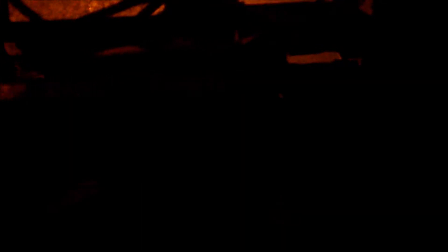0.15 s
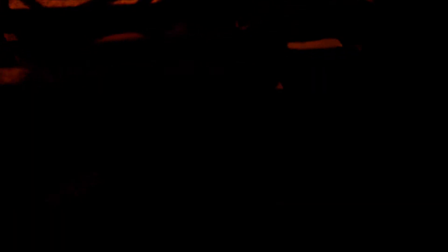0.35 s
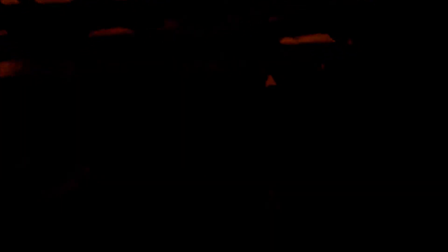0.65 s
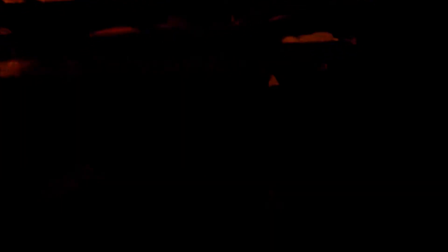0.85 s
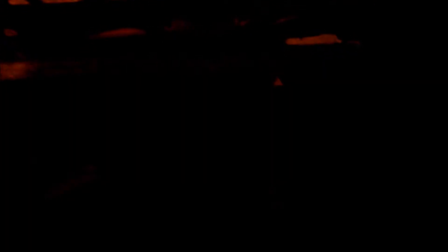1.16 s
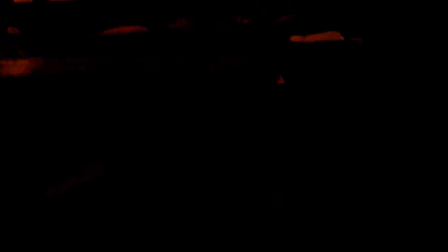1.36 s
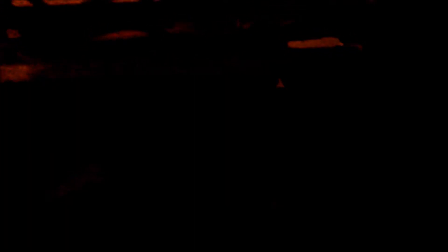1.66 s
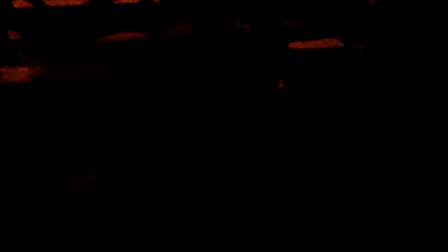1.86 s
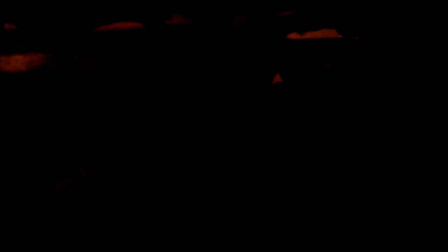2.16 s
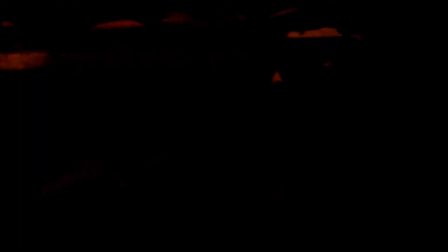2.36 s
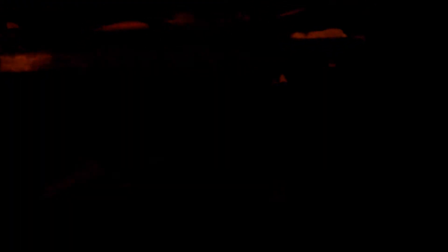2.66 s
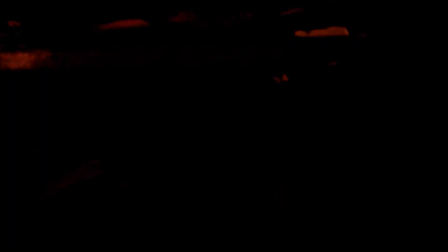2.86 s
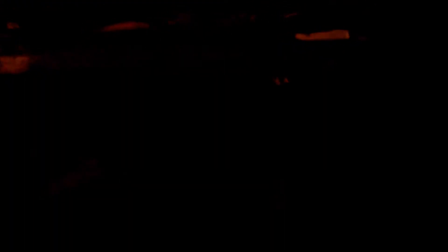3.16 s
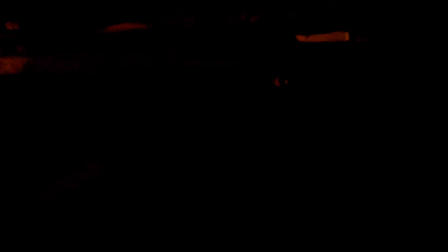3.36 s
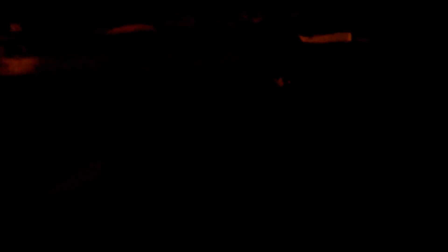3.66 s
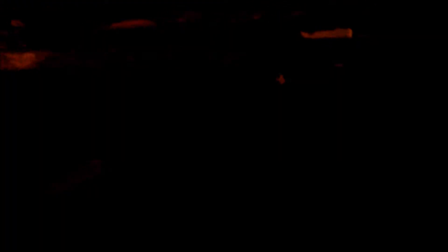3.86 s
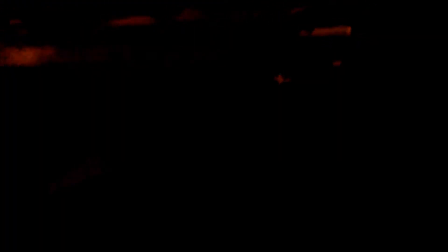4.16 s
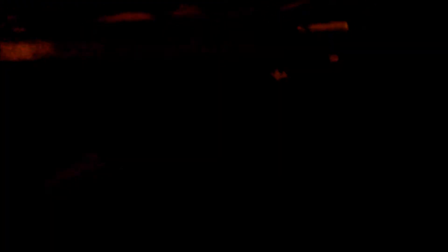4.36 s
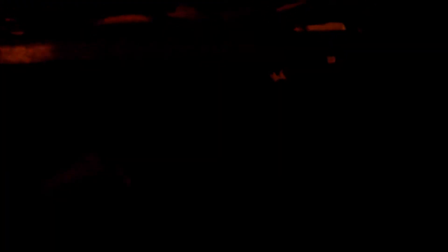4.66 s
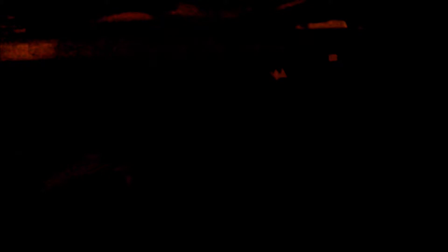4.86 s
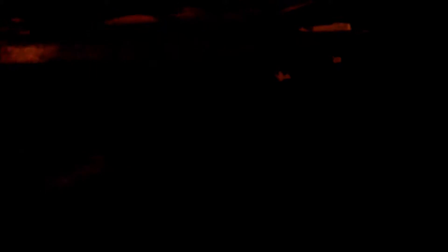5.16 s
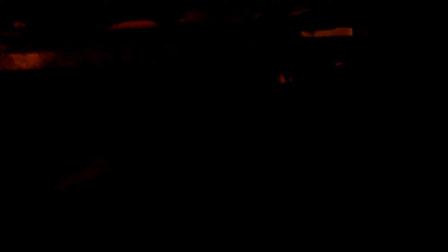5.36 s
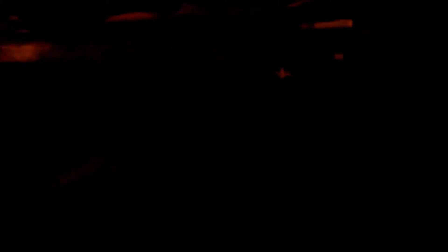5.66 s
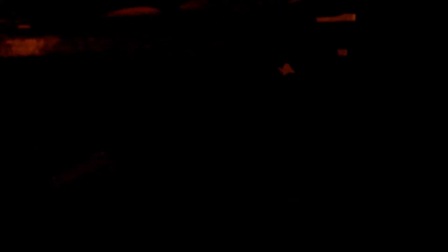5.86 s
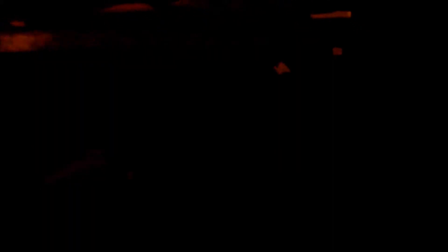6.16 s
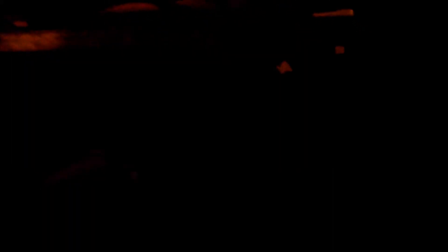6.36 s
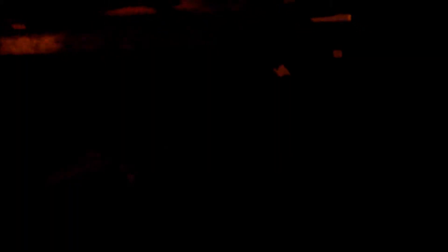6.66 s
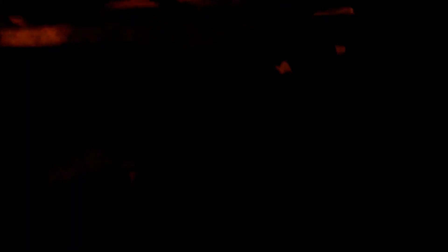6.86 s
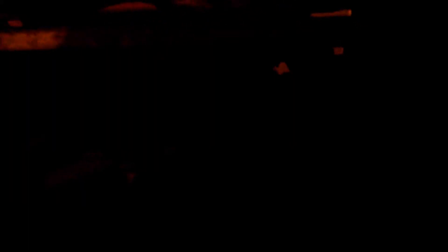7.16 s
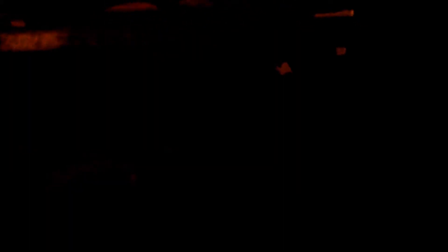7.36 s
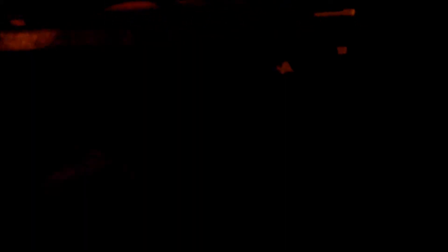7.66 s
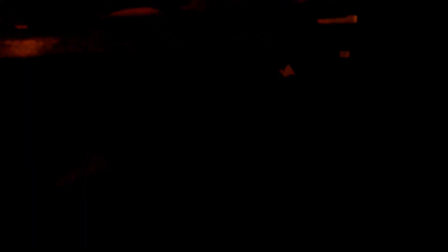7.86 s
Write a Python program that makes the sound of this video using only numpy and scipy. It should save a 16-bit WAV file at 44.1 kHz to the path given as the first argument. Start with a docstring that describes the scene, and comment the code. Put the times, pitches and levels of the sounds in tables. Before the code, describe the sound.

Steady heating-blower drone heard close up indoors: a deep electrical hum near 120 hertz, boxy airflow noise with metallic colouring, and a fast fluttering buzz of tiny panel ticks. A fuzzy low tone wavers beneath. The rattle varies slightly from burst to burst and weakens briefly near the end, while the fan keeps running. Wide stereo, with soft top treble.

```python
"""Air rushes steadily through the sheet-metal cabinet of a furnace draft fan in a small utility space.
The rush is noise coloured by resonances; the motor hum is a sum of tones at multiples of two rates.
A loose panel rattles in bursts whenever magnetic pull and wheel unbalance push the same way: short noise ticks.
A low boom near 185 Hz wavers irregularly beneath, a tone of wandering pitch. A nearby camera widens its two
microphone ports by subtracting each, delayed, from the other."""
import sys
import numpy as np
from scipy import signal
from scipy.fft import rfft, irfft, next_fast_len
from scipy.io import wavfile
from scipy.ndimage import uniform_filter1d, map_coordinates

SR = 44100
rng = np.random.default_rng(int(sys.argv[2]) if len(sys.argv) > 2 else 0)


def put_to_file(sound):
    """Save the sound as 16-bit audio at rate SR, in the file named by the first command-line argument."""
    columns = np.atleast_2d(sound).T  # one column per channel
    safe = np.clip(columns, -1, 1)
    whole_steps = np.round(safe * 32767)
    wavfile.write(sys.argv[1], SR, whole_steps.astype(np.int16))


N = 353682

# Smooth part of the furnace spectrum at the near port, before widening: [f/Hz, density/(dB per Hz)]
AIR_SPECTRUM = [(20, -57), (45, -61), (60, -51.5), (160, -56), (230, -80), (430, -63), (600, -66),
                (760, -71.5), (1100, -72.5), (1500, -70), (2450, -79), (3700, -78), (6000, -76),
                (10000, -84.5), (15500, -87)]
# Air resonances of ducts and room: [f/Hz, width/Hz, peak density/(dB per Hz)]
DUCT_RESONANCES = [(82, 15.5, -44), (129.7, 12, -42), (183.5, 19, -44.5), (198.1, 14.7, -44),
                   (236.6, 36, -52), (276, 24, -45.5), (310, 46, -47.5), (357, 48, -57), (392.8, 30, -51),
                   (403, 5.6, -48.5), (464.4, 37, -55), (525, 120, -55.5), (590, 43, -61), (679, 21, -60.5),
                   (725, 18, -64.5), (805, 61, -67), (873, 40, -62), (918, 21, -65), (1007, 62, -67)]
# Sheet-metal resonances of the cabinet: [f/Hz, width/Hz, peak density/(dB per Hz)]
CABINET_RESONANCES = [(1148, 30, -65), (1206, 30, -64), (1258, 28, -60), (1330, 45, -65), (1643, 30, -60),
                      (1740, 35, -66), (1890, 180, -65), (1925, 30, -66), (2180, 200, -67),
                      (2270, 110, -64), (2676, 373, -67.5), (2899, 90, -66.4), (3095, 162, -71.8),
                      (3406, 545, -71.3), (4169, 111, -72.2), (4620, 119, -78.7), (5718, 220, -78.3),
                      (6703, 512, -81.4), (7610, 200, -81), (8850, 600, -76.5), (9494, 337, -83.2),
                      (12058, 481, -84.9), (14875, 252, -85.6)]
# Brief dips of the rush: [t/s, depth/dB]
FLOW_DIPS = [(3.2, 2), (4.65, 1), (5.25, 1.5), (6.98, 1.5)]
DIP_S = 0.12  # from the middle of a dip to 1/e of its depth
FLOW_WAVER_DB, FLOW_WAVER_HZ = 0.19, 5  # scale, and random knots per second

PULL_HZ, SHAFT_HZ = 119.984, 54.676  # magnetic pull rate and wheel rotation rate
PULL_S, SHAFT_S = .0012, .0148  # first peak of each push on the panel
# Motor tones of the magnetic pull: [multiple of PULL_HZ, rms level/dB]
PULL_TONES = [(1, -19), (3, -47), (6, -56), (8, -55), (9, -58)]
# Motor tones of the turning wheel: [multiple of SHAFT_HZ, rms level/dB]
SHAFT_TONES = [(1, -38), (2, -41), (3, -48), (4, -47), (6, -44), (12, -55), (18, -59), (22, -59), (24, -60),
               (34, -57)]

# Panel contacts in each pull cycle: [delay/cycles, shaft angle/turns, relative level/dB]
PANEL_CONTACTS = [(.045, .045, 0), (.115, .07, -4), (.185, .12, -2), (.27, .19, -7), (.41, .26, -13),
                  (.54, .3, -11), (.62, -.25, -15)]
# Rattle bursts, one each time pull and unbalance fall into step: [t/s, relative level/dB]
RATTLE_LEVEL = [(0.047, 1.5), (0.141, 1), (0.235, -3), (0.329, 0.5), (0.423, 2), (0.517, 1), (0.612, 2),
                (0.706, 0), (0.8, 0), (0.894, 1), (0.988, -1), (1.082, 0.4), (1.176, 1), (1.27, 0.5),
                (1.364, 2), (1.458, 1), (1.552, -4.6), (1.646, -0.0), (1.74, 1), (1.834, 1.3), (1.928, -1),
                (2.022, 1.3), (2.116, -3), (2.21, 2), (2.305, 0), (2.399, 1.4), (2.493, -2), (2.587, 3),
                (2.681, -0.5), (2.775, 0.5), (2.869, 1), (2.963, 0.5), (3.057, -1), (3.151, 1.0),
                (3.245, 0), (3.339, -3), (3.433, -1), (3.527, -0.5), (3.621, -1), (3.715, 0), (3.809, -1),
                (3.903, 0.0), (3.998, -2), (4.092, -1.3), (4.186, -6.7), (4.28, 2.5), (4.374, 0),
                (4.468, 2.1), (4.562, -1), (4.656, 1), (4.75, 1), (4.844, -1), (4.938, 0), (5.032, -5.2),
                (5.126, 1.5), (5.22, -1), (5.314, -1), (5.408, 0), (5.502, 1), (5.596, -1), (5.691, 0.5),
                (5.785, 3), (5.879, 1.5), (5.973, -2), (6.067, 2.4), (6.161, 2), (6.255, 2.6), (6.349, 2),
                (6.443, 0), (6.537, 0.7), (6.631, 0.5), (6.725, 1.3), (6.819, -1.2), (6.913, -0.9),
                (7.007, -1), (7.101, -9.1), (7.195, -9.1), (7.289, -9.1), (7.384, -2), (7.478, -5),
                (7.572, 0), (7.666, -2), (7.76, -4), (7.854, -2), (7.948, -1)]
# Share of the furnace spectrum's power that comes from panel ticks: [f/Hz, share (0-1)]
RATTLE_SHARE = [(1800, 0.01), (2900, 0.04), (4100, 0.43), (5500, 0.09), (7200, 0.51), (8800, 0.56),
                (11000, 0.15), (12500, 0.25), (14800, 0.6)]
GAP = .42  # push needed to touch (0-1)
STIFFEN = .65  # exponent: tick strength grows more slowly than push
TICK_T60_S, TICK_RISE_S = 0.0031, .0002  # 60 dB decay time, and rise time constant
RING_T60_S, RING_DB = 0.055, -19  # the panel's ring after a tick: decay time, level relative to the tick

# Irregular level of the narrow low boom, before the BOOM_DB lift: [t/s, rms level/dB]
BOOM_LEVEL = [(0.0, -31), (0.25, -53), (0.5, -42), (0.75, -55), (1.0, -35), (1.25, -33.5), (1.5, -39),
              (1.75, -46), (2.0, -34), (2.26, -40), (2.51, -32.5), (2.76, -40), (3.01, -40), (3.26, -36),
              (3.51, -46), (3.76, -42), (4.01, -29.5), (4.26, -40), (4.51, -42), (4.76, -35.5), (5.01, -36),
              (5.26, -42), (5.51, -44), (5.76, -36), (6.02, -41), (6.27, -48.5), (6.52, -37), (6.77, -42),
              (7.02, -38), (7.27, -43), (7.52, -43), (7.77, -33.5), (8.02, -43)]
BOOM_HZ, BOOM_WANDER_HZ, BOOM_DB = 185, 4.08, 8.5  # centre, wander scale, lift of the level curve

# Slow change in the top treble of rush and rattle: [t/s, relative level/dB]
TREBLE_LEVEL = [(0, 0), (1.5, -1.2), (3, 0), (3.3, -1.2), (5, -1), (5.2, -1.5), (6.3, -1), (6.8, -1),
                (7.1, -3), (7.8, -3.5), (8.02, -1)]
TREBLE_HZ = 10500  # half-amplitude point of the top treble
# Far port against near port: [f/Hz, relative level/dB, likeness (0-1), phase lead/rad]
FAR_PORT = [(30, 2, .98, 0), (48, 2, .96, -0.3), (55, -2.5, 1, 1.5), (64, -1, 0.98, 1.7),
            (126, -3.5, 0.84, 0.1), (300, -8, 0.97, -0.06), (696, -5, 0.92, -0.67), (1074, -2.5, 0.5, -1),
            (1423, 1.2, 0.64, -3), (2176, -4, 0.47, -3), (2345, -2.5, 0.82, 0.7), (2640, 0.5, 0.47, 1),
            (3380, -2.5, 0.32, 3), (4350, -1, 0.48, -2.5), (6450, -9.5, 0.16, 1.5), (7720, 3.5, 0.34, -1.5),
            (9000, -1, 0.4, 2.5), (10800, -1, 0, -1.5), (14000, 4, 0.1, 2), (14700, 2.5, 0.8, -0.3),
            (15500, -1, 0.95, 2.5)]
WIDEN_S = 16 / SR  # delay of the subtracted port
ROLL_OFF_HZ, ROLL_OFF_DB_PER_KHZ, TOP_HZ = 15470, 140, 15725  # start and slope of the roll-off, band limit


def air():
    """Turbulent flow noise: a random, slightly patchy spectrum filtered by duct and cabinet resonances."""
    spectrum = signal.stft(rng.standard_normal((2, N + 512)), nperseg=512)[2]
    # smoothing over 8 frequency bins and 10 frames makes the patches
    patches = uniform_filter1d(rng.standard_normal(spectrum.shape[1:]), 8, 0)
    patches = uniform_filter1d(patches, 10, 1)
    patchy = spectrum * amp(0.81 * unit(patches))
    noise = signal.istft(patchy, nperseg=512)[1][:, :N]
    rush = filtered(unit(noise), lambda hz: furnace(hz) * np.sqrt(1 - rattling(hz)))
    return flow() * ports(*rush)


def flow():
    """Amplitude modulation of the rush: a slight random waver and a few Gaussian dips."""
    t = np.arange(N) / SR
    dips_db = sum(depth * np.exp(-((t - middle) / DIP_S) ** 2) for middle, depth in FLOW_DIPS)
    return amp(FLOW_WAVER_DB * wobble(FLOW_WAVER_HZ) - dips_db)


def furnace(hz):
    """Resonance: peaks of the furnace body add in power to a smooth spectrum; returns the gain."""
    # each width spans the points 6 dB below the peak
    peaks = sum(amp(2 * db) / (1 + (2 * (hz - centre) / width) ** 2) ** 2
                for centre, width, db in DUCT_RESONANCES + CABINET_RESONANCES)
    density = amp(2 * along(AIR_SPECTRUM, hz)) + peaks
    return np.sqrt(SR / 2 * density)  # white noise of rms 1 has density 2 / SR


def motor():
    """Harmonic series: tones at multiples of the pull and wheel rates, wavering slightly in level."""
    t = np.arange(N) / SR
    tones = [(k * PULL_HZ, db) for k, db in PULL_TONES]
    tones += [(k * SHAFT_HZ, db) for k, db in SHAFT_TONES]
    hum = np.zeros(N)
    for hz, db in tones:
        peak = np.sqrt(2) * amp(db + 0.41 * wobble(3.11))
        hum += peak * np.cos(2 * np.pi * (hz * t + rng.random()))
    return ports(hum, 0 * hum)


def panel():
    """Impact with beating: pull-cycle contacts tick when unbalance closes the gap, some ten bursts a second."""
    blows = panel_blows() * looseness()
    t = np.arange(2048) / SR
    decay = amp(-60 * t / TICK_T60_S) + amp(RING_DB - 60 * t / RING_T60_S)
    shape = (1 - np.exp(-t / TICK_RISE_S)) * decay
    # part of each tick repeats exactly, part is new as the contact point wanders
    tick = shape * rng.standard_normal((2, len(t)))
    repeat = signal.fftconvolve(blows[None], tick, axes=1)[:, :N]
    fresh = signal.fftconvolve(blows, shape)[:N] * rng.standard_normal((2, N))
    rattle = unit(0.82 * repeat + fresh)
    return ports(*filtered(rattle, lambda hz: furnace(hz) * np.sqrt(rattling(hz))))


def panel_blows():
    """Threshold contact: an impulse wherever the wheel's push exceeds the gap, with random scatter."""
    cycle = PULL_S + np.arange(int(N / SR * PULL_HZ)) / PULL_HZ
    blows = np.zeros(N + SR)
    for delay, angle, db in PANEL_CONTACTS:
        times = cycle + delay / PULL_HZ
        chance = rng.standard_normal((len(times), 2))
        push = np.cos(2 * np.pi * (SHAFT_HZ * (times - SHAFT_S) - angle))
        excess = np.maximum(push - GAP + 0.15 * chance[:, 0], 0)
        force = excess ** STIFFEN * amp(db + 1.5 * chance[:, 1])
        np.add.at(blows, np.round(times * SR).astype(int), force)
    return blows[:N]


def looseness():
    """Amplitude modulation of the rattle, burst by burst."""
    return amp(over_time(RATTLE_LEVEL))


def rattling(hz):
    """Power partition: the share of the furnace spectrum that is rattle."""
    return np.clip(along(RATTLE_SHARE, hz), 0, .9)


def boom():
    """Narrow resonance: a fuzzy low tone whose frequency and level waver irregularly."""
    level_db = over_time(BOOM_LEVEL) + BOOM_DB + 1.4 * wobble(12)
    pitch_hz = BOOM_HZ + BOOM_WANDER_HZ * wobble(16)
    tone = np.sqrt(2) * amp(level_db) * np.cos(2 * np.pi * np.cumsum(pitch_hz) / SR)
    return ports(tone, 0 * tone)


def dulled(x):
    """Time-varying filtering: the top treble of x follows the treble curve."""
    top = filtered(x, lambda hz: 1 / (1 + (TREBLE_HZ / (hz + 1)) ** 6))
    return x + top * (amp(over_time(TREBLE_LEVEL)) - 1)


def ports(near, other):
    """Partial coherence: the far port hears the near wave shifted in phase, plus sound by another path."""
    def gain(hz):
        return amp(along(FAR_PORT, hz))

    def alike(hz):
        return np.clip(along(FAR_PORT, hz, axis=2), 0, 1)

    same = filtered(near, lambda hz: gain(hz) * alike(hz) * np.exp(1j * along(FAR_PORT, hz, axis=3)))
    separate = filtered(other, lambda hz: gain(hz) * np.sqrt(1 - alike(hz) ** 2))
    return np.array([near, same + separate])


def amp(db):
    """Decibel law: level to amplitude gain."""
    return 10 ** (np.asarray(db) / 20)


def unit(x):
    """Normalisation: x at rms 1."""
    return x / np.sqrt(np.mean(x ** 2) + 1e-20)


def along(points, hz, axis=1):
    """Logarithmic frequency scale: one column of a table interpolated at hz."""
    table = np.transpose(points)
    return np.interp(np.log(hz + 1), np.log(table[0] + 1), table[axis])


def over_time(points):
    """Linear interpolation: a (t/s, level/dB) table at every sample."""
    return np.interp(np.arange(N) / SR, *np.transpose(points))


def wobble(rate):
    """Slow random fluctuation: a smooth curve through `rate` random knots a second."""
    knots = rng.standard_normal(int(N * rate / SR) + 4)
    return map_coordinates(knots, [np.arange(N) * rate / SR])


def filtered(x, response):
    """Linear filtering: the spectrum of x times a complex response of frequency."""
    m = next_fast_len(N + 8192)
    return irfft(rfft(x, m) * response(np.fft.rfftfreq(m, 1 / SR)), m)[..., :N]


def scene():
    """Superposition: rush, rattle, boom and hum add at both ports."""
    return dulled(air() + panel()) + boom() + motor()


def record(dry):
    """Pressure-difference widening: each port minus the delayed other, then a roll-off and a band limit."""
    late = filtered(dry[::-1], lambda hz: .89 * np.exp(-2j * np.pi * hz * WIDEN_S))

    def band(hz):
        edge_db = -ROLL_OFF_DB_PER_KHZ * np.maximum(hz - ROLL_OFF_HZ, 0) / 1000
        return amp(edge_db) * (hz < TOP_HZ)

    return filtered(dry - late, band)


dry = scene()
out = record(dry)
put_to_file(out)
```